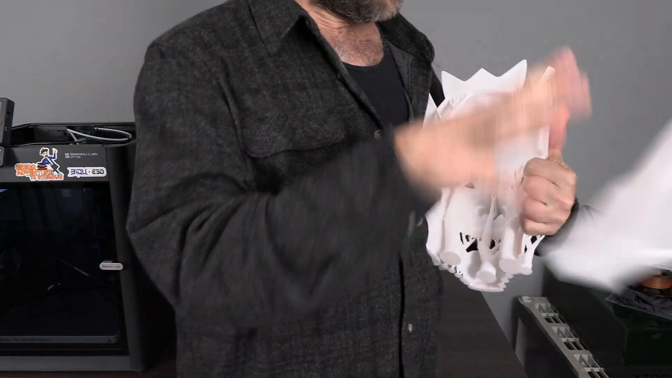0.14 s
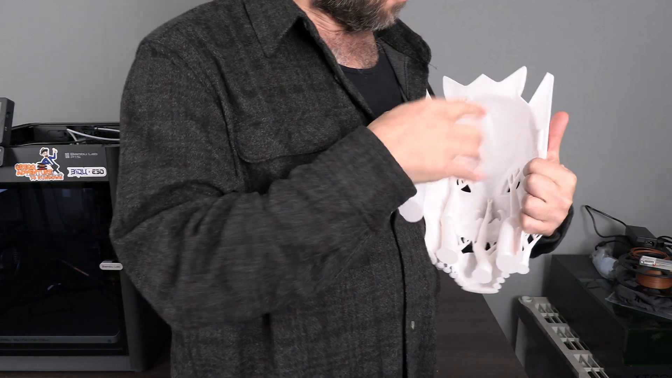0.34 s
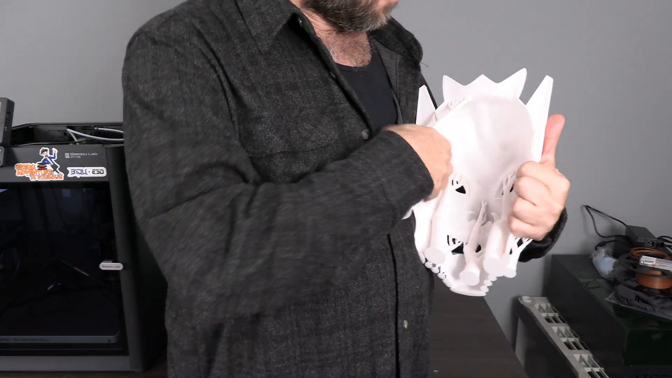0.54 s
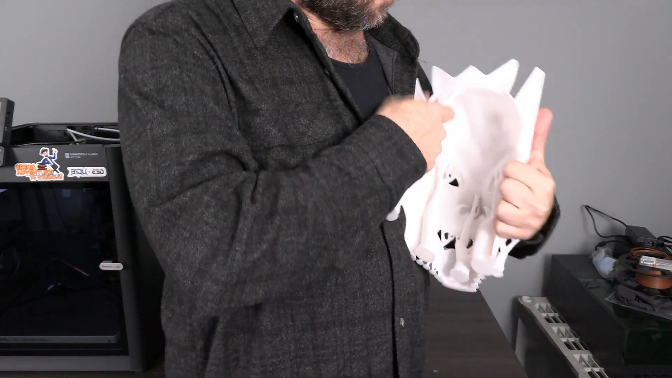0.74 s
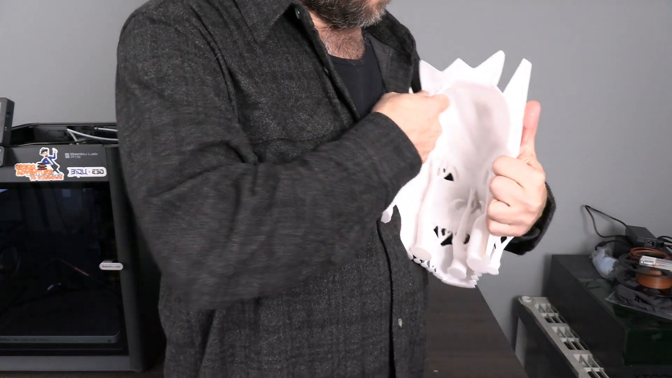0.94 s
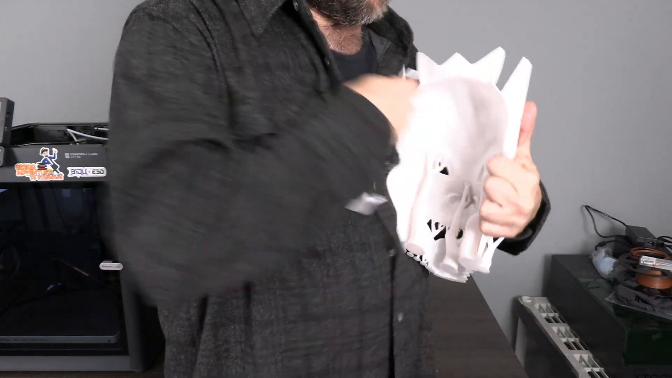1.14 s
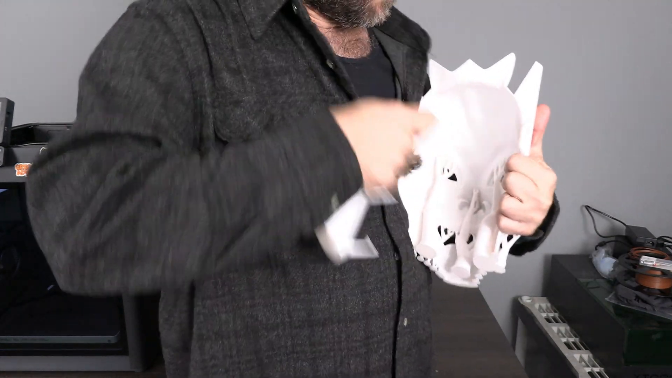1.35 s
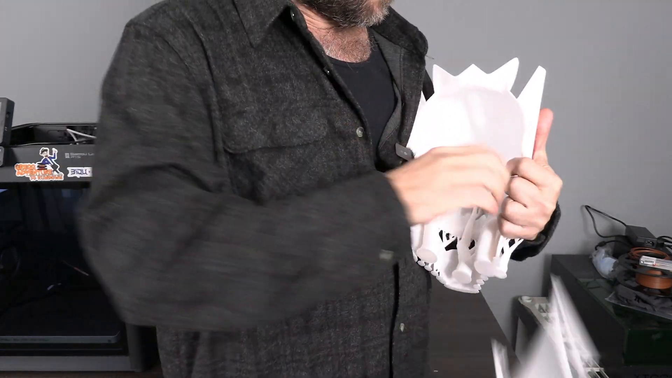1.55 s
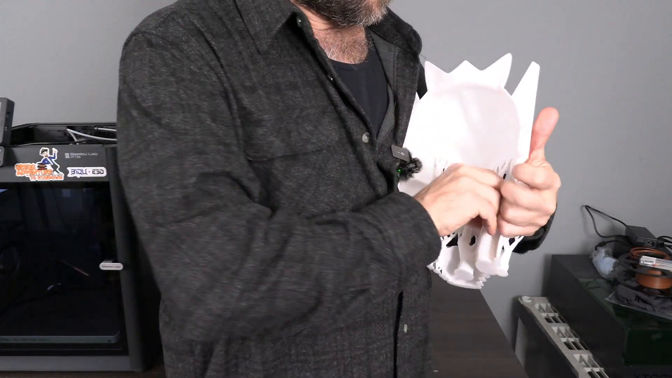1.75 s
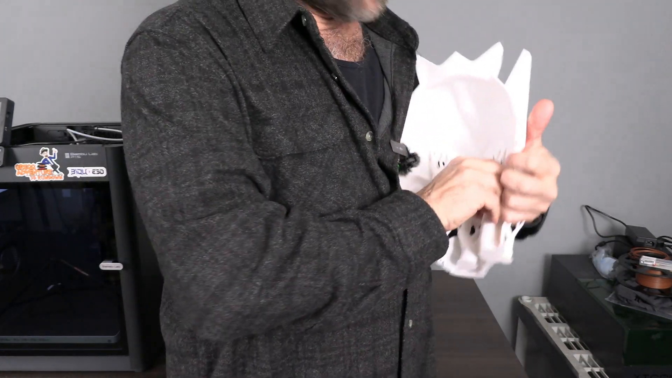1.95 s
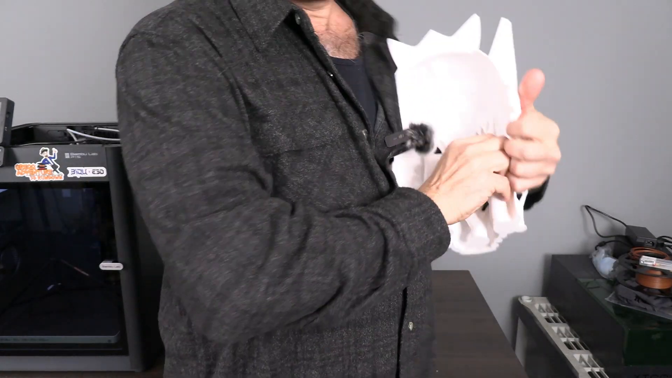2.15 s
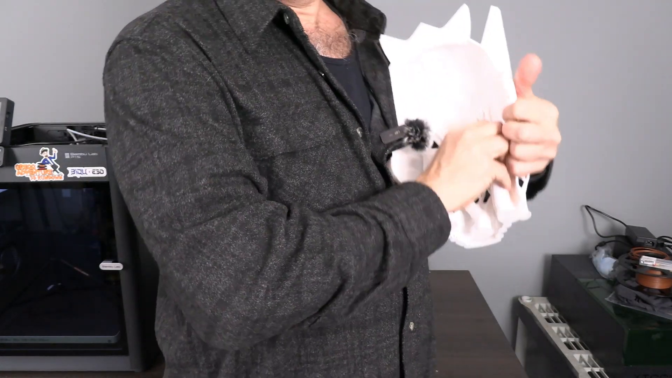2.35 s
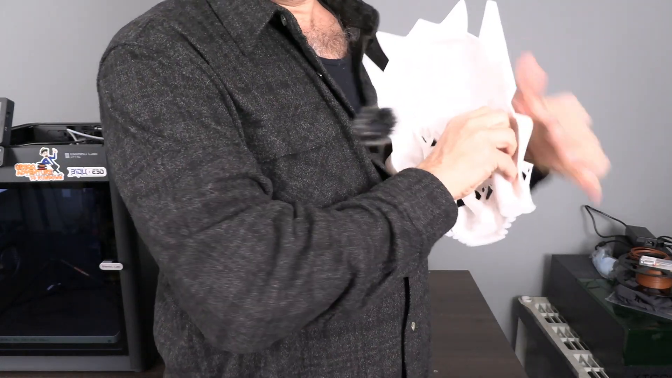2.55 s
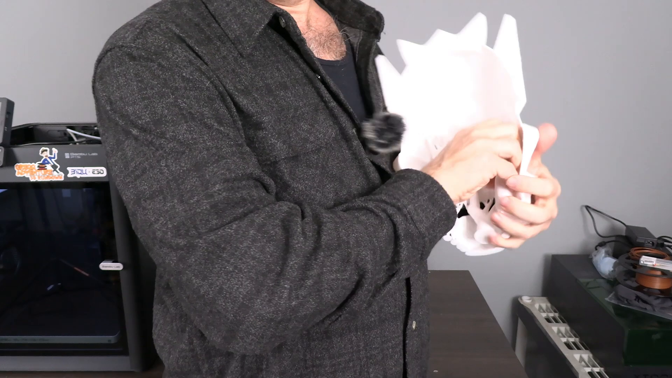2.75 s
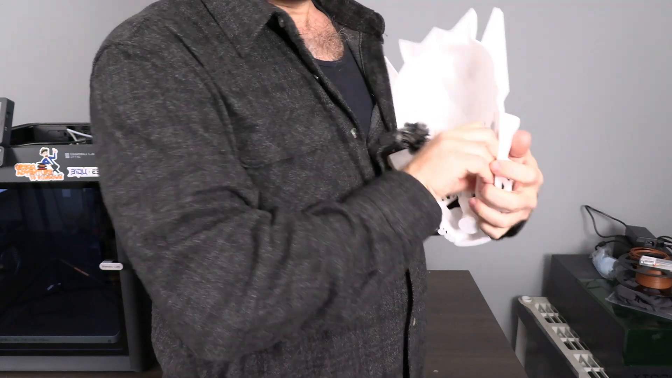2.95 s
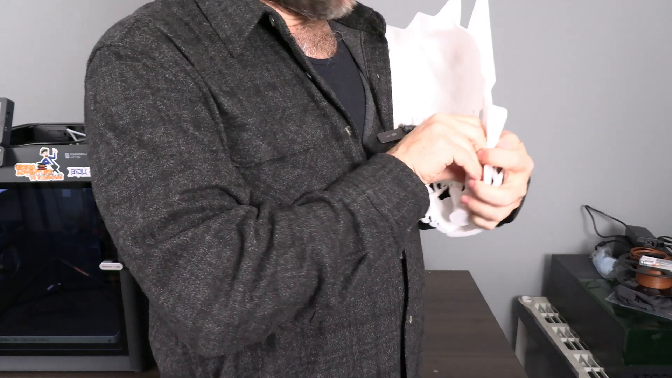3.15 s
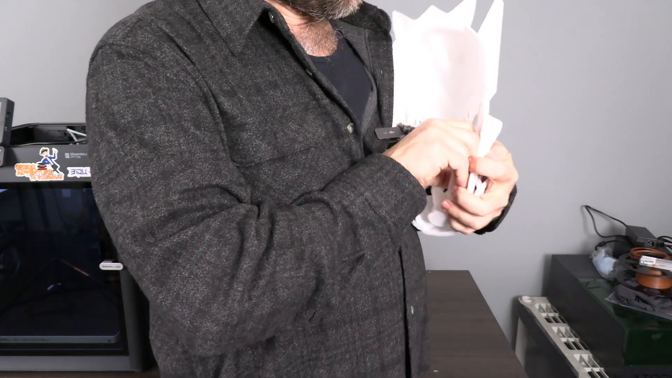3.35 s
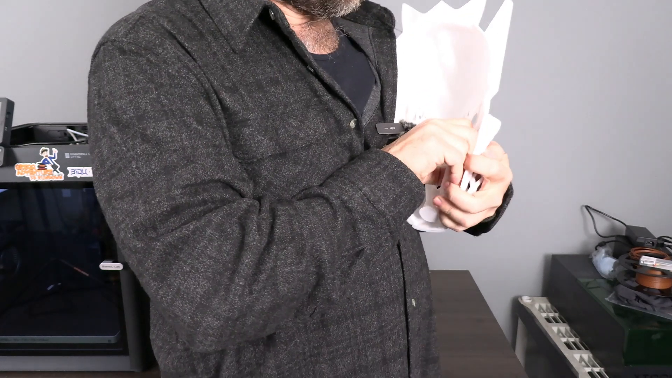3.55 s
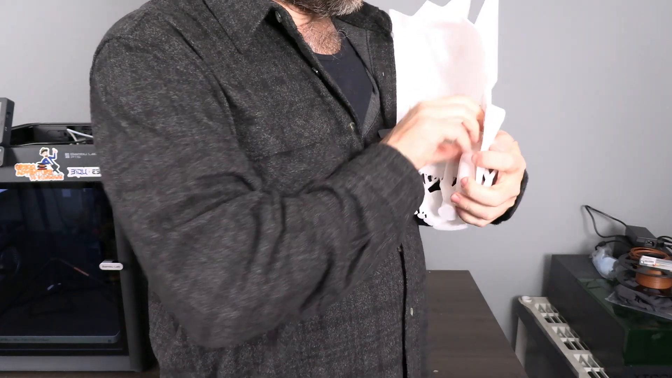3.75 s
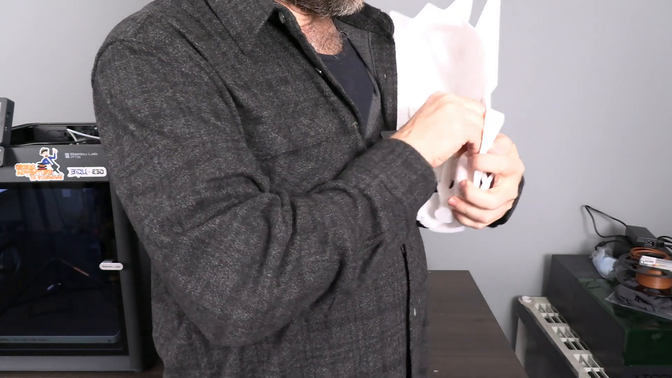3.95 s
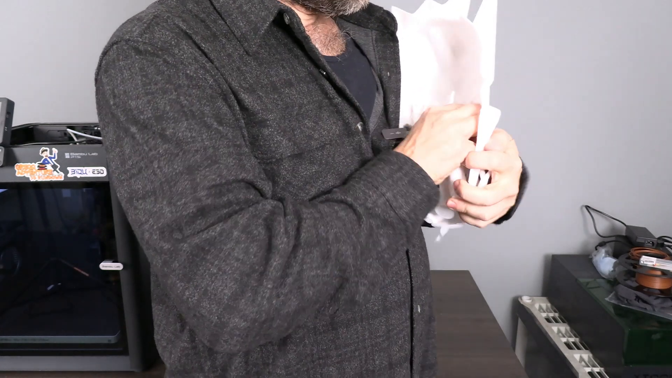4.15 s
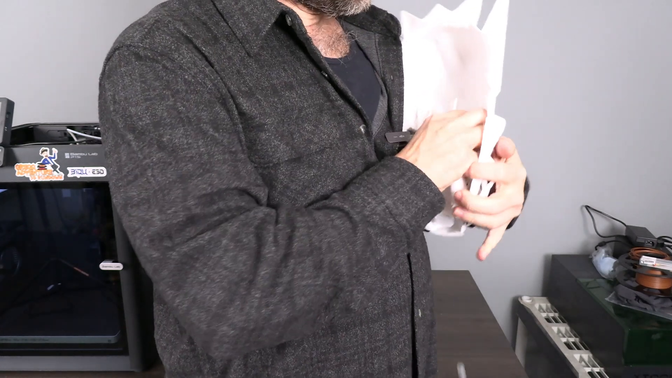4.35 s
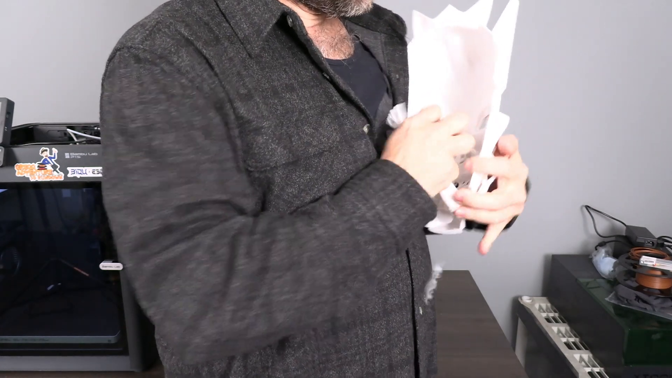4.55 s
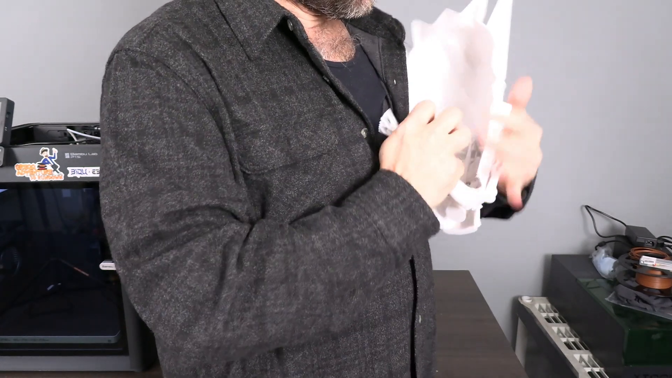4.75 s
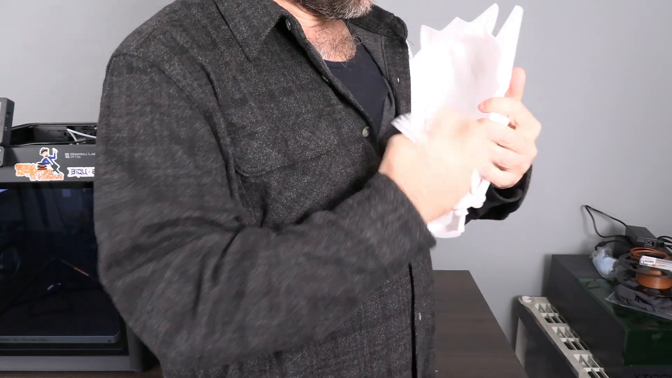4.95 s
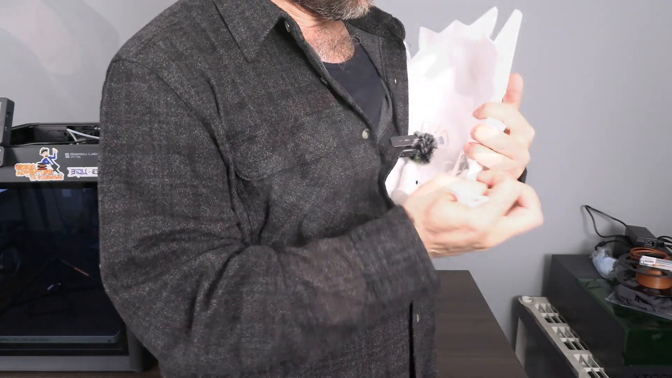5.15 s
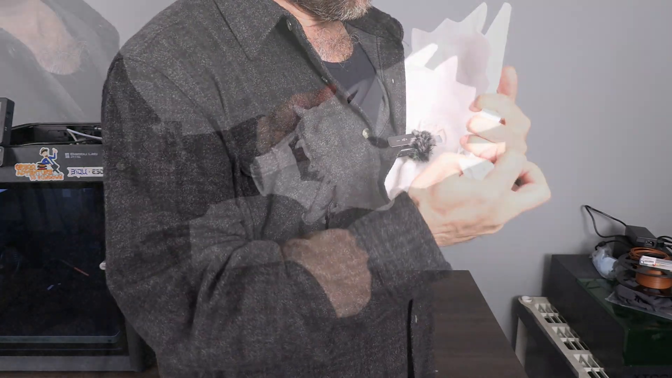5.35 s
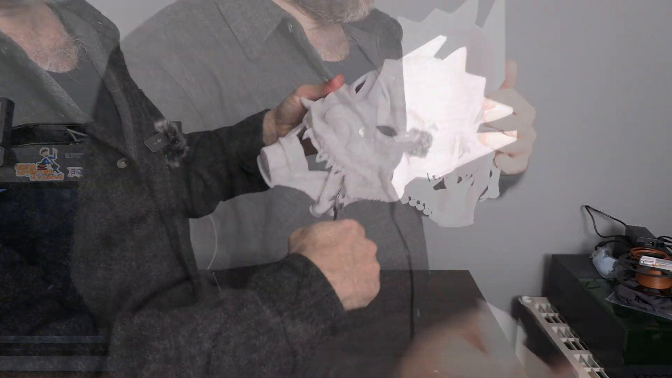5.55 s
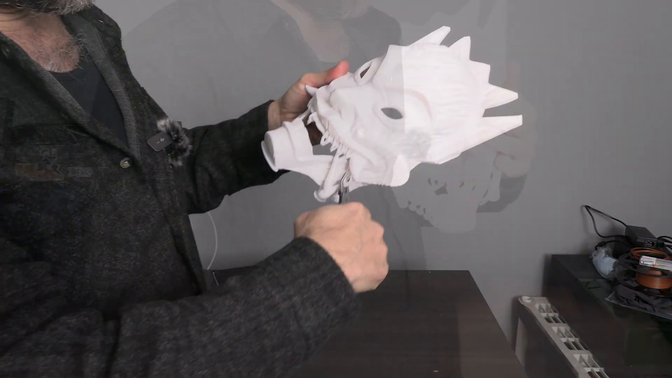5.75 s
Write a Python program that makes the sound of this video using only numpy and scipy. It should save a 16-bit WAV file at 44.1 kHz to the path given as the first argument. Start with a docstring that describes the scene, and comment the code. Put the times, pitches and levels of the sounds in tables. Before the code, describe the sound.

Brittle plastic struts snap off a thin hollow shell in sharp, irregular cracks, with finger scrapes and faint shirt rustle close to the microphone.

```python
"""Plastic support struts are snapped off a hollow printed mask held at the chest, by a lapel microphone.
Over rustle and shirt rumble, finger strokes scrape and small breaks grow into a dense run near 1.2 s;
scrap knocks on the floor near 2.0 s, short dry taps follow to 2.5 s, then hard cracks and a rip near 4.6 s.
Each break is a burst of noise ringing strut and shell; knocks and taps are two close modes, scrapes are
jerky hiss, bumps damped swings, the small room noise tails; the loudest cracks overload the input."""
import sys
import numpy as np
from scipy import signal
from scipy.fft import rfft, irfft
from scipy.io import wavfile

SR = 44100
rng = np.random.default_rng(int(sys.argv[2]) if len(sys.argv) > 2 else 0)


def to_wav(s):
    """Save 16-bit WAV."""
    ch = np.atleast_2d(s).T  # columns
    pcm = np.round(np.clip(ch, -1, 1) * 32767)  # PCM
    wavfile.write(sys.argv[1], SR, pcm.astype(np.int16))


N = 255780  # 5.8 s

# All levels are those ahead of the input overload.
# Faint rustle, its level curve: (time [s], level [dB])
HUSH_LEVEL = [(0, -68), (0.602, -69.5), (1.7, -61.5), (2.399, -61.5), (4.449, -64), (5.302, -65.5),
              (5.8, -74)]
# Faint rustle, its spectrum: (frequency [Hz], relative density [dB])
HUSH_SPECTRUM = [(40, -19), (200, -2.5), (700, 1), (1500, -4), (5000, -10), (10000, -11), (15000, -23)]
# Shirt moving under the microphone, its level curve: (time [s], level [dB])
CLOTH_LEVEL = [(0.0, -72), (0.42, -62.5), (0.9, -48.5), (1.18, -56), (1.45, -72.5), (1.84, -72),
               (2.23, -50.5), (2.41, -56.5), (2.78, -68), (3.99, -59.5), (4.51, -60), (4.83, -51),
               (5.02, -50.5), (5.8, -78)]
# Shirt rumble, its spectrum: (frequency [Hz], relative density [dB])
CLOTH_SPECTRUM = [(25, -47.5), (60, -4.5), (150, -0.5), (300, -4)]
# Bumps that reach the microphone through cloth: (time [s], peak [dB], frequency [Hz], t60 [s])
BUMPS = [(0.374, -28, 355, 0.023), (.677, -41.5, 82, 0.063), (0.786, -29, 132, 0.017),
         (0.918, -10.5, 150, 0.01), (1.029, -20.5, 159, 0.028), (1.037, -25, 149, .043),
         (1.232, -3.5, 323, 0.042), (1.251, 0, 180, .022), (1.269, -18.5, 119, 0.067),
         (3.38, -27, 180, 0.027), (4.128, -12, 347, 0.017), (4.212, -14, 450, 0.0072),
         (4.615, -11.5, 102, 0.022), (4.632, -15.5, 400, .13), (2.618, -42.5, 154, .1),
         (4.662, -22, 48, .06), (4.912, -32, 134, .021), (4.994, -25, 127, 0.013),
         (5.675, -45.5, 40.4, 0.036)]
# Finger strokes on the print; each fades in before and out after its nominal span:
# (time [s], nominal length [ms], scrape level [dB], dull level [dB], hum where the shell is touched [Hz])
STROKES = [(.149, 67, -63.5, -60, 870), (0.299, 109, -62, -60, 340), (0.404, 125, -59.5, -49.5, 497),
           (.64, 112, -54.5, -57.5, 590), (0.746, 22, -45.5, -36.5, 727), (0.768, 36, -36.5, -37, 498),
           (0.809, 130, -50.5, -47, 825), (0.93, 230, -54, -52.5, 390), (1.07, 144, -50, -49, 517),
           (1.302, 94, -48, -60, 856), (1.583, 104, -60.5, -59.5, 910), (1.829, 67.5, -53, -59, 700),
           (2.016, 48, -54.5, -42, 635), (2.086, 93, -48.5, -52.5, 587), (2.18, 69, -54.5, -56.5, 720),
           (2.292, 45, -60, -53, 704), (2.362, 22, -53, -45.5, 850), (2.558, 41, -49.5, -50, 376),
           (2.78, 61, -61.5, -63, 1376), (2.867, 71, -58, -62, 777), (2.989, 66, -47.5, -51, 950),
           (3.104, 102, -58, -53.5, 947), (3.249, 190, -64, -74, 680), (3.768, 66, -45.5, -46, 1366),
           (3.857, 11.8, -59, -42.5, 488), (3.942, 26, -59, -60, 714), (4.057, 57.7, -66, -45, 500),
           (4.345, 88, -56, -66.5, 418.5), (4.801, 55, -45.5, -47, 1740), (4.866, 61.5, -46, -53, 1928),
           (4.946, 35, -63, -48.5, 517), (5.019, 80, -60, -53.5, 790), (5.116, 31, -50.5, -44, 523),
           (5.151, 38.7, -43, -41, 1790), (5.226, 95, -77.5, -60.5, 2020), (5.364, 35, -55, -52, 1320)]
# Bright scrape of the layer lines: (frequency [Hz], relative density [dB])
SCRAPE_SPECTRUM = [(1500, 10.5), (2500, -7), (4000, 1.5), (7000, 0.5), (10000, -3), (14000, -9.5)]
# Dull noise of the rubbed shell: (frequency [Hz], relative density [dB])
DULL_SPECTRUM = [(250, -4.5), (500, 3.5), (900, 1), (1500, -17.5), (2300, -6.5)]
# Hollow knocks of scrap landing and of later short taps, each with its own room send:
# (time [s], peak [dB], ring [Hz], send to the room over direct [dB])
KNOCKS = [(2.005, -28.5, 592, 2), (2.01, -21, 660, 23), (2.026, -28, 706, 11), (2.057, -33.5, 680, 28),
          (2.079, -31.5, 724, 16), (2.249, -19, 695, -2.5), (2.282, -25, 693, 9), (2.463, -20.5, 650, 1.5),
          (2.491, -25.5, 706, 4)]
# Strut breaks: (time [s], crack peak [dB], upper strut ring [Hz], ring peak over raw crack [dB], shell peak [dB])
SNAPS = [(.196, -36, 8500, -15, -55), (.334, -39, 5000, -20, -49), (.3745, -31, 4530, -2.5, -32.5),
         (.415, -37.5, 6100, -20, -52), (.4634, -30.5, 3530, -51, -37), (.6588, -34, 8000, -15, -50),
         (.7507, -27, 4700, 14, -23), (.7727, -24.5, 3900, 2, -24.5), (.8051, -11.5, 4900, -1, -14),
         (.917, -17.5, 2480, -19, -12), (.9897, -31, 8400, -4, -53), (1.1109, -9.5, 3220, 3.5, -31),
         (1.2119, 5, 2480, 8, 1.5), (1.2255, 11, 2300, -6.5, 7.5), (1.2501, 2, 4420, 1, -25.5),
         (1.2609, -10.5, 2450, 1.5, -29.5), (1.289, -14.5, 2940, -4, -37), (1.3515, -25, 8400, -12, -32),
         (1.3763, -33, 6430, -13, -49), (1.8419, -31.5, 3210, -1, -30), (2.1238, -21.5, 6160, -21, -32),
         (2.6142, -27.5, 5600, 16, -37), (2.7097, -38, 3510, -5.5, -24.5), (2.7918, -43, 4930, -4, -37),
         (3.0216, -27, 2900, 16.5, -44), (3.1118, -33, 2710, -4.5, -35), (3.3801, 2.5, 7270, 26.5, -15.5),
         (3.4971, -0.5, 7400, -27, -10.5), (3.6448, -43, 2120, -40.5, -28.5),
         (3.684, -16.5, 8830, -21.5, -19.5), (3.698, -53, 2200, -13, -37.5), (3.7135, -14.5, 1970, 4, -39),
         (3.7417, -33.5, 4370, -7, -27.5), (3.8337, -25, 2650, -4, -29), (3.863, -34.5, 4800, 1, -48),
         (3.8741, -26, 8900, -10, -45), (3.925, -39.5, 3180, 7, -49.5), (4.091, -48, 7950, -1.5, -54.5),
         (4.106, -37.5, 7540, 4, -44.5), (4.128, 18.5, 6900, -23, -21), (4.1338, 8, 3130, -5, 6.5),
         (4.138, 5, 3440, -2.5, -2), (4.211, -19, 2120, 2, -10.5), (4.306, -23.5, 6300, -20.5, -31.5),
         (4.4948, -2.5, 5980, 6.5, -25.5), (4.576, -43, 3300, 0.5, -42.5), (4.6109, 20.5, 5840, -27, 10.5),
         (4.6805, -13.5, 2730, 0, -37), (4.7205, -28, 2480, -23, -8), (4.8604, -41, 5640, -.5, -24.5),
         (4.9928, -10.5, 7400, -6.5, -10.5), (5.011, -45, 2340, -21, -23), (5.056, -31.5, 2230, -23, -25),
         (5.0719, -21, 5350, -7, -19), (5.2116, -8.5, 2060, -3.5, -45), (5.2699, -31.5, 6740, 9.5, -33),
         (5.3869, -29, 3190, 14, -34), (5.511, 6, 2220, -13, -2.5), (5.5533, -44, 2360, -13, -18)]
# Shell modes before the grip shifts them: (frequency [Hz], relative gain [dB], t60 [s])
SHELL_MODES = [(430, -4, .025), (620, -3, .025), (820, -1, .022), (1000, -2, .02), (1200, 0, .02),
               (1490, -2, .016), (1750, -1, .014), (2050, -3, .012)]
# Room tail by band, before the early boost: (frequency [Hz], t60 [s], tail energy [dB])
ROOM_BANDS = [(160, 0.41, -41.5), (355, .4, -34), (1020, 0.4, -29), (2420, 0.21, -24), (6300, 0.37, -27),
              (12000, 0.2, -24)]

# decay of a break's noise at 0 dB or above; weaker ones are shorter by this share of their dB
TEAR_MS, TEAR_SLOPE = 1.53, 0.14
RATTLE_MS = 0.54  # decay of the noise that excites a knock or tap
# ticks scattered through each stroke: least peak over the scrape, mean extra, shell over crack
TICKS_PER_STROKE = 4
TICK_DB, TICK_SPREAD_DB, TICK_SHELL_DB = 7, 3, -8.5
TICK_LOW_HZ, TICK_HIGH_HZ = 3760, 9300
# one strut rips loose in a run of slips, each weaker than the last
RIP_SLIPS, RIP_S, RIP_GAP_S = 9, 4.6205, 0.0039
RIP_DB, RIP_FADE_DB, RIP_HZ = -12, 1.5, 2273
OVERLOAD = 0.64  # amplitude ceiling of the input
TOP_HZ = 16000


def undb(db):
    """Decibels to gain."""
    return 10 ** (np.asarray(db) / 20)


def level_curve(points):
    """Gain over the whole scene from (time [s], level [dB]) points."""
    s, db = np.transpose(points)
    return undb(np.interp(np.arange(N) / SR, s, db))


def band(x, lo_hz, hi_hz):
    """Causal band-pass."""
    return signal.sosfilt(signal.butter(2, [lo_hz, hi_hz], "bandpass", fs=SR, output="sos"), x)


def ring(x, hz, t60):
    """One mode driven by x, losing 60 dB in t60 seconds."""
    pole = np.exp(2j * np.pi * hz / SR - np.log(1000) / (t60 * SR))
    return signal.lfilter([1], [1, -pole], x).imag


def peak(x, db):
    """Scales x to a peak level."""
    return x * undb(db) / np.abs(x).max()


def add(out, x, s):
    """Mixes x into out from time s."""
    i = int(s * SR)
    out[i:i + len(x)] += x[:N - i]


def colour(x, points):
    """Gives x a spectrum of (frequency [Hz], level [dB]) points, steep outside them; rms 1."""
    hz, db = np.transpose(points)
    log_hz = np.log(hz)
    f = np.log(np.arange(1, N // 2 + 2) * SR / N)
    outside = np.maximum(log_hz[0] - f, 0) + np.maximum(f - log_hz[-1], 0)
    y = irfft(rfft(x) * undb(np.interp(f, log_hz, db) - 24 * outside), N)
    return y / y.std()


def grains(rate, spread_db, jerk_db=3.):
    """Tiny slips of very different sizes, rate per second on average, swell a jerky hiss."""
    sizes = undb(spread_db * np.minimum(rng.exponential(size=N), 3))
    slips = (rng.random(N) < rate / SR) * sizes
    knots = np.arange(0, N, 250)
    jerk = undb(jerk_db * np.interp(np.arange(N), knots, rng.standard_normal(len(knots))))
    swell = 1 + signal.lfilter([1], [1, -.9], slips)
    return rng.standard_normal(N) * jerk * swell


def tear(ms, scatter_db=4., rise_ms=.6):
    """Uneven noise, as of fibres giving way: a quick run-up, then a decay with time constant ms."""
    t = np.arange(4096) * 1000 / SR  # ms
    scatter = np.repeat(rng.standard_normal(len(t) // 16), 16)  # uneven strength in short steps
    fibres = rng.standard_normal(len(t)) * undb(scatter_db * scatter)
    return fibres * (1 - np.exp(-t / rise_ms)) * np.exp(-t / ms)


def hush():
    """Faint room tone and rustle: grainy broadband noise riding a level curve."""
    return level_curve(HUSH_LEVEL) * colour(grains(60., 3.), HUSH_SPECTRUM)


def cloth():
    """Low uneven rumble of the shirt: sparse slips in dark noise, riding a level curve."""
    return level_curve(CLOTH_LEVEL) * colour(grains(13.0, 3.4), CLOTH_SPECTRUM)


def room(x, near_t60=0.033, near_db=22.5):
    """Reverberation: noise dies away band by band; chest, hands and desk answer first and briefly."""
    t = np.arange(SR // 2) / SR
    tail = 0
    for hz, t60, db in ROOM_BANDS:
        noise = band(rng.standard_normal(len(t)), hz / 1.81, hz * 1.35)
        part = noise * np.exp(-np.log(1000) * t / t60)
        tail = tail + part * undb(db) / np.sqrt(np.sum(part ** 2))
    early = 1 + undb(near_db) * np.exp(-np.log(1000) * t / near_t60)
    onset = np.clip(t / 0.0035, 0, 1)
    return signal.fftconvolve(x, tail * early * onset)[:N]


def bumps():
    """Soft pushes through cloth set the microphone in a damped swing."""
    out = np.zeros(N)
    for s, db, hz, t60 in BUMPS:
        push = np.zeros(8192)
        width = int(.45 * SR / hz)  # just under half a cycle
        push[:width] = np.hanning(width)
        add(out, peak(ring(np.gradient(push), hz, t60), db), s)
    return out


def rubbing(edge=0.44, hum_t60=0.024, hum_db=-1.0):
    """Fingers scrape the ridged plastic in strokes and the shell hums dully with them."""
    slips = grains(220., 4.5)
    scrape, dull = colour(slips, SCRAPE_SPECTRUM), colour(slips, DULL_SPECTRUM)
    out = np.zeros(N)
    for s, ms, scrape_db, dull_db, hz in STROKES:
        stroke = np.hanning(int(1.3 * ms * SR / 1000)) ** edge
        start = int(SR * (s - .15 * ms / 1000))
        part = slice(start, start + len(stroke))
        hum = ring(slips[part], hz, hum_t60)
        body = dull[part] + undb(hum_db) * hum / hum.std()
        out[part] += stroke * (undb(scrape_db) * scrape[part] + undb(dull_db) * body)
    return out


def hollow_knocks(t60=0.027, tick_db=-11.5):
    """Scrap landing and short taps: two close modes and a weak tick, direct and toward the walls."""
    near, around = np.zeros(N), np.zeros(N)
    for s, db, hz, wet_db in KNOCKS:
        force = tear(RATTLE_MS)
        hollow = ring(force, hz, t60) + 0.5 * ring(force, 1.03 * hz, 0.5 * t60)
        tick = peak(band(force, 2000, 5340), tick_db)
        knock = peak(peak(hollow, 0) + tick, db)
        add(near, knock, s)
        add(around, knock * undb(wet_db), s)
    return near, around


def breaks():
    """The listed breaks, the rip, and small random ticks while the fingers slide."""
    rows = list(SNAPS)
    for k in range(RIP_SLIPS):
        db = RIP_DB - RIP_FADE_DB * k
        rows.append((RIP_S + RIP_GAP_S * k, db, RIP_HZ, -6, db - 5.5))
    chances = rng.random((len(STROKES), TICKS_PER_STROKE, 3))
    for (s, ms, scrape_db, *_), chance in zip(STROKES, chances):
        for place, size, pitch in chance:
            db = scrape_db + TICK_DB - TICK_SPREAD_DB * np.log(1 - size)
            hz = TICK_LOW_HZ * (TICK_HIGH_HZ / TICK_LOW_HZ) ** pitch
            rows.append((s + place * ms / 1000, db, hz, 0, db + TICK_SHELL_DB))
    return rows


def snap(force, grip, crack_db, hz, ring_db, shell_db, strut_t60=0.0048):
    """One break: a broad crack, two rings of the strut, and the shell's modes as the grip leaves them."""
    strut = 0.55 * ring(force, hz, strut_t60) + ring(force, 0.7856 * hz, strut_t60)
    crack = peak(band(force, 2500, 10000), 0) + peak(strut, ring_db)
    modes = 0
    for (f, db, t60), (gain, detune) in zip(SHELL_MODES, grip):
        modes = modes + undb(db + 3 * gain) * ring(force, f * (1 + .05 * detune), t60)
    shell = peak(modes, 0) + peak(band(force, 450, 2000), 0)
    return peak(crack, crack_db) + peak(shell, shell_db)


def snaps():
    """Every break, as sound toward the microphone and sound toward the walls."""
    near, around = np.zeros(N), np.zeros(N)
    blow = np.zeros(4096)
    blow[0] = 1
    for s, crack_db, hz, ring_db, shell_db in breaks():
        colours = crack_db, hz, ring_db, shell_db
        ms = TEAR_MS * undb(TEAR_SLOPE * min(max(crack_db, shell_db), 0))
        grip = rng.standard_normal((len(SHELL_MODES), 2))
        direct = snap(tear(ms), grip, *colours)
        # summed over all directions the fibres' interference evens out: same energy, smooth spectrum
        smooth = snap(blow, grip, *colours)
        add(near, direct, s)
        add(around, smooth * direct.std() / smooth.std(), s)
    return near, around


def scene():
    """All sources at the microphone; breaks, knocks and rubbing also feed the room."""
    cracks, cracks_out = snaps()
    knocks, knocks_out = hollow_knocks()
    rub = rubbing()
    wet = room(cracks_out + rub) + room(knocks_out, near_db=18.0)
    return (cracks + knocks + rub + wet + bumps() + cloth() + hush())[None]


def record(dry):
    """The input overloads on the loudest cracks and the top is cut."""
    clipped = dry / (1 + np.abs(dry / OVERLOAD) ** 6) ** (1 / 6)
    return signal.sosfilt(signal.ellip(10, .2, 95, TOP_HZ, fs=SR, output="sos"), clipped)


dry = scene()
out = record(dry)
to_wav(out)
```